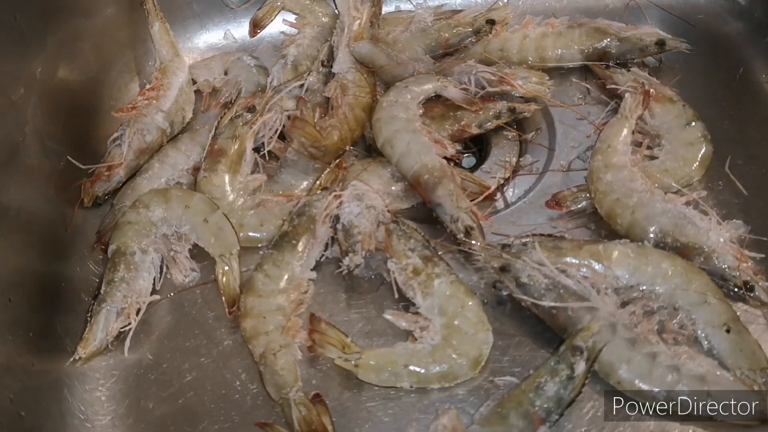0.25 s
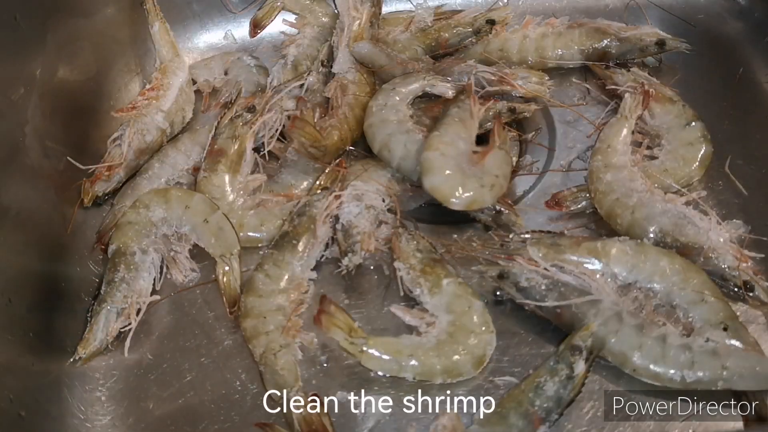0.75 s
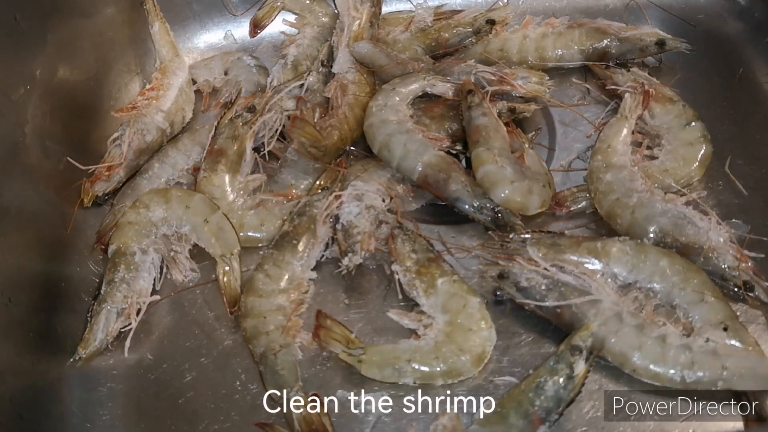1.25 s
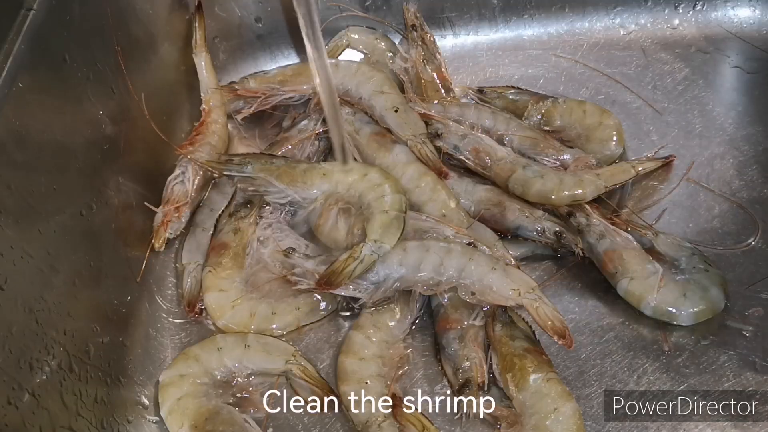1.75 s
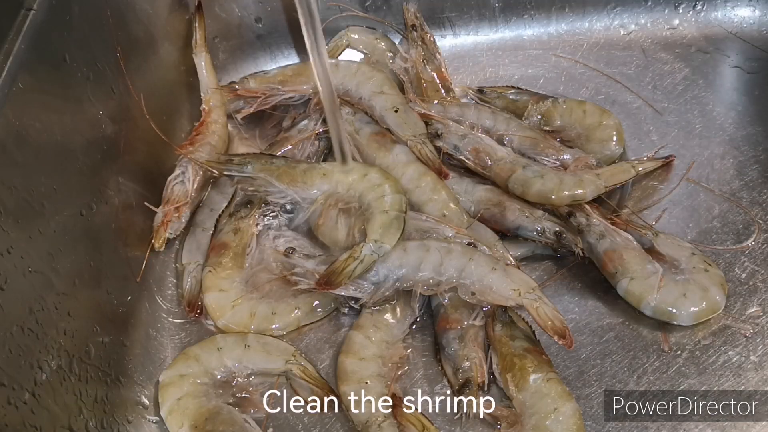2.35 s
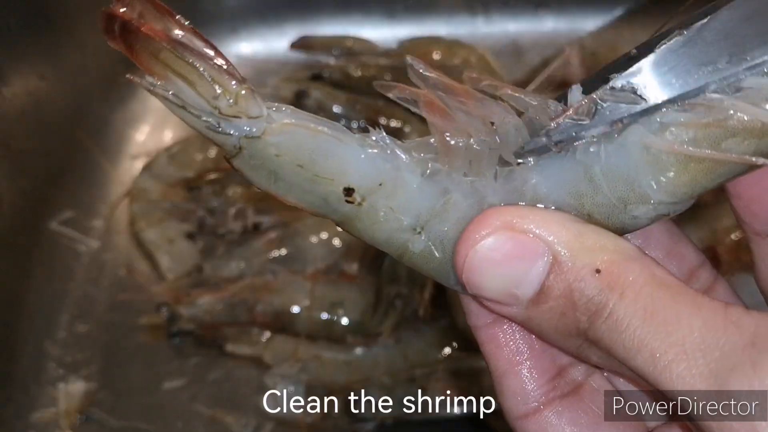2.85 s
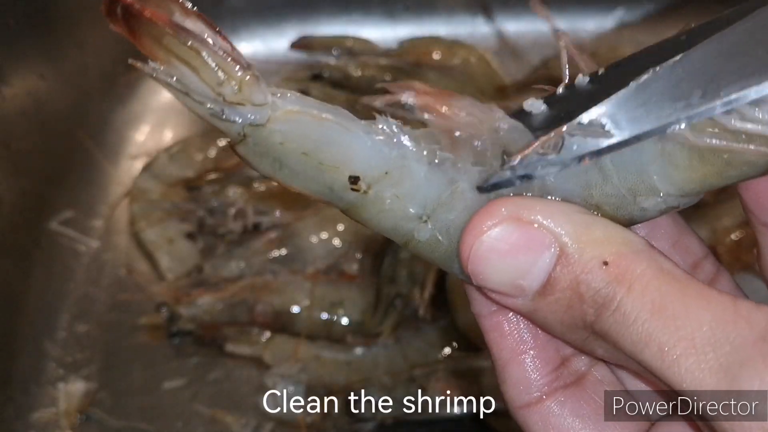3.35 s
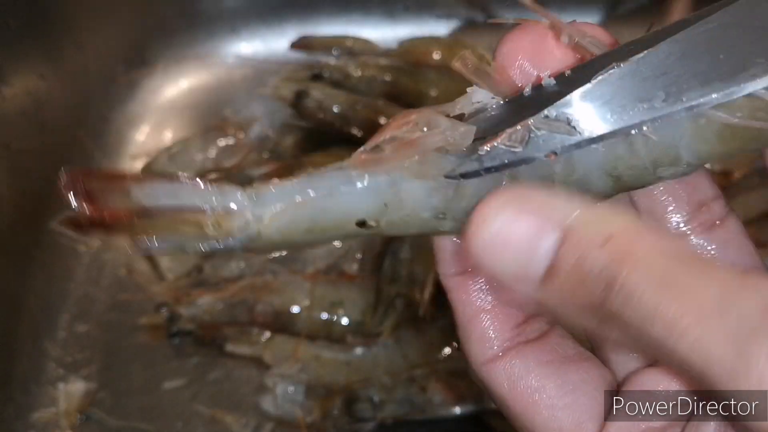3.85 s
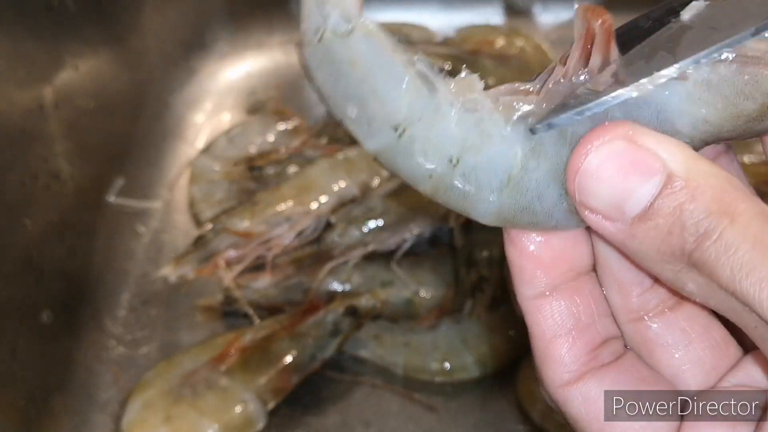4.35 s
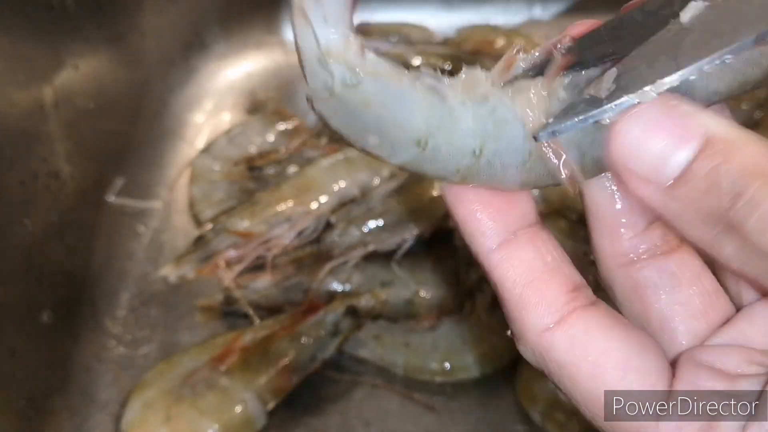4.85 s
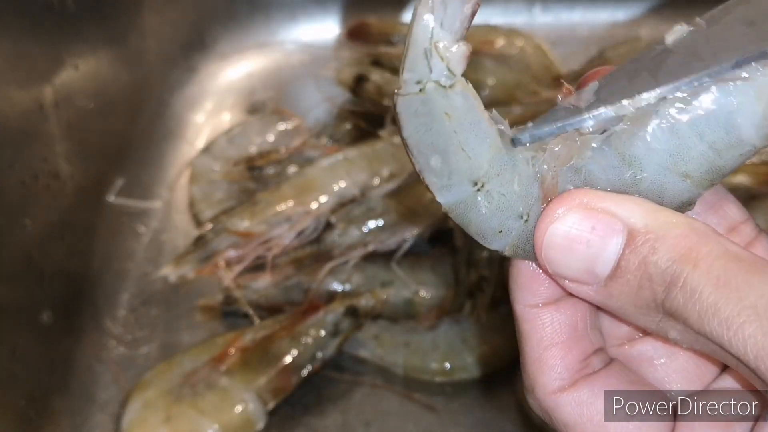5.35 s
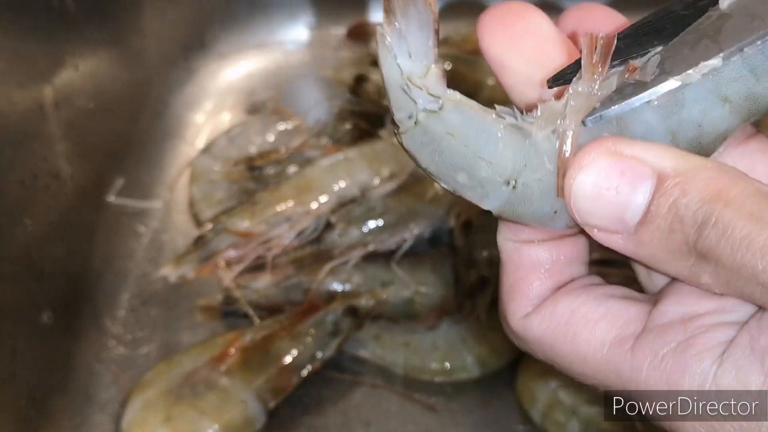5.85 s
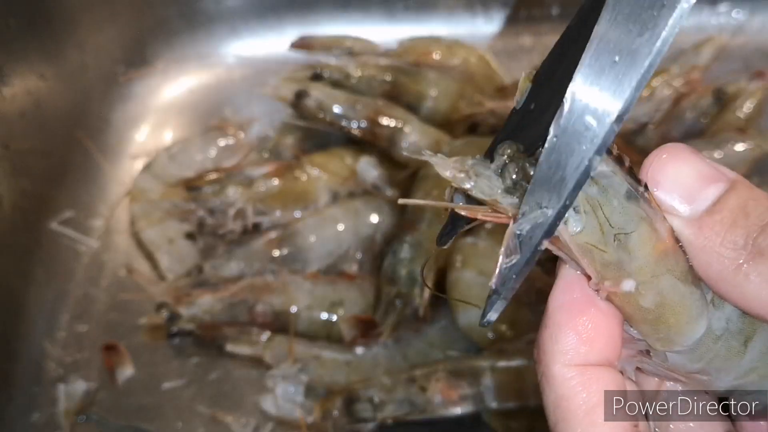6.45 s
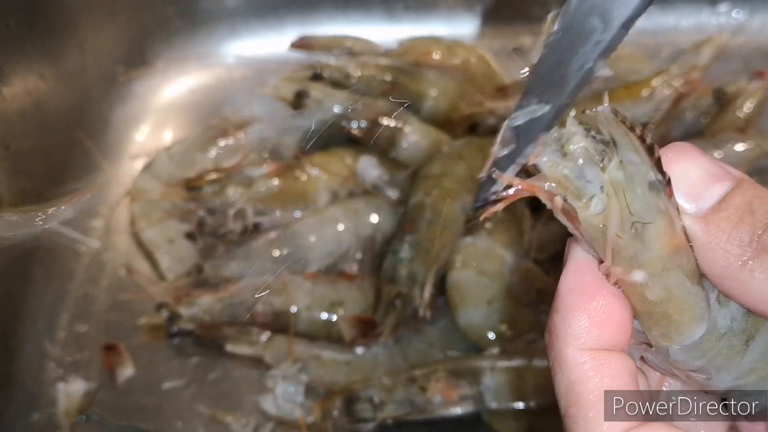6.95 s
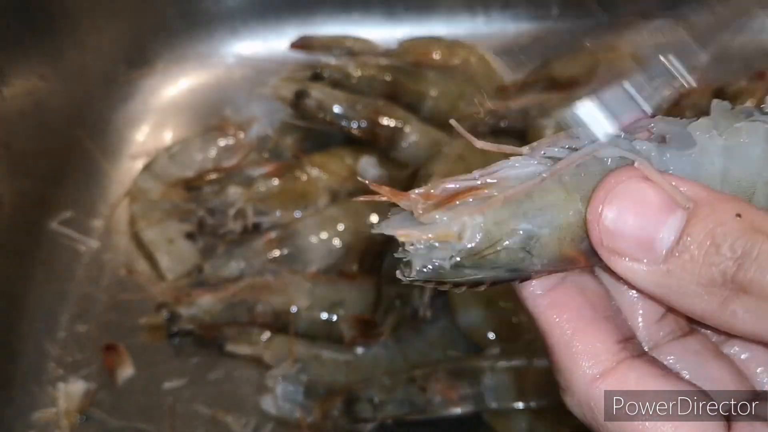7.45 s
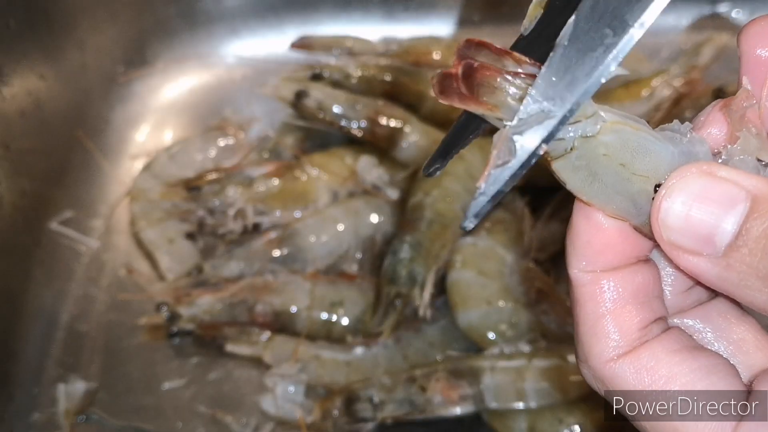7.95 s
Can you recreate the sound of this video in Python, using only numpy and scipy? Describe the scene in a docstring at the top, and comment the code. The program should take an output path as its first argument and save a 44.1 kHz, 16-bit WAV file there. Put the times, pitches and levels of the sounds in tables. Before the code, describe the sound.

Tap water spatters unevenly in a steel kitchen sink, heard close up. At about 0.7 seconds a raw shrimp lands with a wet slap and a thud that briefly rings the basin. The drops thin out around 1 second, then pick up again. From 1.5 seconds the tap runs in a steady, airy hiss with a faint high whistle, drumming softly on the heap of shrimp, and stops abruptly at 2.8 seconds.

Scissors then cut through legs and shells, slightly to the right. Each cut is a run of tiny crackles ending in a sharp snap of the blades. A faint one comes at 3.1 seconds, a loud one at 3.7, moderate ones at 4.6, 5.5 and 6.2, and another loud one with a trailing crunch at 7.1. Small shell ticks and a few soft, dull bumps fall between cuts. A faint kitchen rumble continues until about 8 seconds.

```python
"""At a steel kitchen sink, raw shrimp are being cleaned. Drops of tap water spatter in the basin, and a
shrimp lands with a thud that sets the steel ringing. The tap then hisses steadily on the heap and stops
abruptly. Over the kitchen's faint rumble, scissors crunch through legs and shells in runs of tiny
breaks, and each cut ends in a sharp snap as the blades clack together."""
import sys
import numpy as np
from scipy import signal
from scipy.io import wavfile

SR = 44100
rng = np.random.default_rng(int(sys.argv[2]) if len(sys.argv) > 2 else 0)


def store_pcm(level_fs):
    """Save levels as 16-bit WAV."""
    pcm = np.round(np.clip(level_fs, -1, 1) * 32767).astype(np.int16)
    wavfile.write(sys.argv[1], SR, np.atleast_2d(pcm).T)


N = 361179
TIME = np.arange(N) / SR
JET_START_S, JET_STOP_S = 1.49, 2.838
CUTOFF_HZ = 15750

# Scissor cuts. Each row: time in seconds, snap level in dB, its low edge, high edge and resonance in Hz,
# relative levels of the handle knock, basin echo and squeezed shell in dB, how many seconds ahead of the
# snap the first crack comes, and that crack's level in dB.
SCISSOR_CUTS = [(3.081, -22.5, 1930, 2600, 3000, -28, 9.5, -54, .019, -22.5),
                (3.719, 3.5, 2150, 10100, 3280, -19.5, 0.5, -36.5, .008, -10.5),
                (4.6158, -3, 2400, 12000, 4220, -22, 5.5, -32.5, .0197, -12.5),
                (5.474, -8, 2530, 7000, 4100, -23.5, 5, -55, .014, -38.5),
                (6.1772, -4, 2600, 10500, 3780, -22, 5.5, -41, 0.0089, -20),
                (7.0774, 3, 2440, 14950, 11000, -15.5, 7.5, -33, .0303, -15)]


def amp(db):
    """Turn decibels into a factor to multiply by."""
    return 10 ** (np.asarray(db) / 20)


def rms_one(x):
    """Scale a sound so that its average strength (rms) is 1."""
    return x / np.sqrt(np.mean(x ** 2) + 1e-20)


def panned(db):
    """Left and right gains that make the left louder by db and keep the total power."""
    return rms_one(amp(np.array([[db], [-db]]) / 2))


def at_hz(points, hz):
    """Read the value at hz off a curve given as rows of frequency and value."""
    freqs, values = np.transpose(points)
    return np.interp(np.log(hz), np.log(freqs), values)


def keep(x, hz, kind, order=2):
    """Keep the "low" part, the "high" part or a "band" of a sound."""
    sos = signal.butter(order, np.clip(hz, 10, .45 * SR), kind, fs=SR, output="sos")
    return signal.sosfilt(sos, x + 1e-18)


def drift(per_s):
    """A random wobble that heads for a new value per_s times a second."""
    knots = np.arange(0, N / SR + 1, 1 / per_s)
    return rms_one(np.interp(TIME, knots, rng.standard_normal(len(knots))))


def ring(x, hz, ring_s):
    """Let x set one pitch ringing; it fades by 60 dB in ring_s."""
    decay, angle = amp(-60 / (ring_s * SR)), 2 * np.pi * hz / SR
    return signal.lfilter([0, np.sin(angle)], [1, -2 * decay * np.cos(angle), decay * decay], x + 1e-18)


def noisy_tone(shape, hz, width_hz):
    """Noise keeps a resonance ringing as a wavering tone."""
    return rms_one(ring(rng.standard_normal(shape), hz, np.log(1000) / (np.pi * width_hz)))


def add(track, start_s, sound):
    """Mix a sound into a track at a given time."""
    i = max(round(start_s * SR), 0)
    track[..., i:i + sound.shape[-1]] += sound[..., :N - i]


def between(start_s, stop_s):
    """1 between two times and 0 outside, with short fades."""
    return np.clip(np.minimum(TIME - start_s, stop_s - TIME) / .004 + .5, 0, 1)


def white():
    """Two unrelated pairs of white noise."""
    return rng.standard_normal((2, 2, N))


def coloured(pairs, spectrum, flicker_db, pan=None):
    """Shape two noise pairs into stereo: each narrow band gets its own level, flicker and place."""
    # Each row: frequency in Hz, how alike left and right are (1 is the same, 0 is unrelated).
    likeness = [(130, 1), (290, .85), (450, 0), (700, 0), (1400, 0.038), (3000, 0)]
    # A sound in the middle. Each row: frequency in Hz, left minus right in dB.
    centred = [(100, 0), (1000, 0)]
    out, low, high = 0, spectrum[0][0], min(spectrum[-1][0], CUTOFF_HZ)
    edges = np.geomspace(low, high, round(4 * np.log2(high / low)) + 1)  # four bands an octave
    for k, band in enumerate(zip(edges, edges[1:])):
        hz = np.sqrt(band[0] * band[1])
        mid, side = keep(pairs[k % 2], band, "band")
        alike = np.clip(at_hz(likeness, hz), -1, 1)
        gain = amp(at_hz(spectrum, hz) + flicker_db * drift(per_s=40)) * panned(at_hz(pan or centred, hz))
        out = out + gain * (np.sqrt(1 + alike) * mid + np.sqrt(1 - alike) * side * [[1], [-1]])
    return rms_one(out)


def reflections(fade_s, rise_s):
    """Dense stereo echoes that build up, then fade by 60 dB in fade_s."""
    t = TIME[:SR // 2]
    echoes = rng.standard_normal((2, len(t))) * amp(-60 * t / fade_s) * (1 - np.exp(-t / rise_s))
    return echoes / np.sqrt(np.sum(echoes ** 2, axis=1, keepdims=True))


def echo(x, response):
    """Pass a sound through stereo echoes."""
    return signal.fftconvolve(np.atleast_2d(x), response, axes=1)[:, :x.shape[-1]]


def kitchen():
    """A low rumble with a few room resonances, a faint wavering hum and a hiss."""
    # Tone of the rumble and of the hiss. Each row: frequency in Hz, relative level in dB.
    rumble_colour = [(22, -13), (49, -1), (86, -3), (135, -2), (229, -16), (344, -15), (450, -21),
                     (600, -34), (750, -28), (900, -42)]
    hiss_colour = [(600, -7), (750, -11.5), (1050, -13.5), (1400, -7), (1850, -3), (2400, -6), (3400, -2.5),
                   (5500, -9.5), (8200, -13.5), (15000, -14.5), (16000, -22)]
    # Room resonances. Each row: pitch in Hz, width in Hz, level against the rumble in dB.
    resonances = [(125, 26, -10.5), (300, 32, -13.5), (365, 110, -12.5), (510, 42, -22.5)]
    rumble = coloured(white(), rumble_colour, flicker_db=3)
    for hz, width_hz, level_db in resonances:
        rumble += amp(level_db) * noisy_tone(N, hz, width_hz)
    hum = rms_one(keep(rng.standard_normal(N), [351, 365], "band"))
    hiss = coloured(white(), hiss_colour, flicker_db=0.5)
    lull_db = -6.5 * between(4.11, 6.28)  # the rumble sinks for a while
    return amp(-55 + lull_db) * rumble + amp(-72) * hum + amp(-68.5) * hiss


def bumps():
    """Shrimp, basin and hands bump: a dull rumble swells and fades, then comes back faintly."""
    # Each row: start in seconds, level in dB, swell time in seconds, pitch in Hz.
    dull_bumps = [(0.549, -31, 0.011, 292), (1.961, -29, 0.025, 174.2), (4.216, -42, 0.027, 54),
                  (5.622, -40.5, 0.038, 48.3), (5.63, -45, 0.032, 194)]
    out = np.zeros(N)
    for start_s, level_db, swell_s, hz in dull_bumps:
        t = TIME[:SR // 2] / swell_s
        swell = t * np.exp(1 - t)
        for delay_s, change_db in (0, 0), (0.16, -18.5):
            rumble = keep(rng.standard_normal(SR), [hz - 24, hz + 24], "band")[-len(t):] * swell
            rumble *= np.linalg.norm(swell) / np.linalg.norm(rumble)
            add(out, start_s + delay_s, amp(level_db + change_db) * rumble)
    return out


def drops(per_s, spread_db, wash_db, bubble_db):
    """Drops of uneven size smeared by the basin, small ringing bubbles and a wash of finer spray."""
    sizes = amp(spread_db * np.minimum(rng.exponential(1, (2, N)), 4)) * rng.choice([-1, 1], (2, N))
    impacts = sizes * (rng.random((2, N)) < per_s / SR)
    smeared = np.array([echo(train, reflections(fade_s=0.013, rise_s=0.00024)) for train in impacts])
    # about one drop in three traps a bubble, which rings for 35 cycles
    pitches = np.geomspace(1150, 4800, num=16)
    choice = rng.integers(0, 3 * len(pitches), N)
    bubbles = sum(ring(impacts * (choice == k), hz, 35 / hz) for k, hz in enumerate(pitches))
    bubbles = rms_one(bubbles)[:, None] * [[1], [0]]  # only in the first of each pair
    water = rms_one(smeared) + amp(wash_db) * white() + amp(bubble_db) * bubbles
    walls = reflections(fade_s=0.043, rise_s=0.00072)
    return np.array([pair + amp(-8.5) * echo(pair, walls) for pair in water])


def spatter():
    """The stream breaks into drops on the steel and sets the basin drumming."""
    # Strength of the flow. Each row: time in seconds, relative level in dB.
    flow_curve = [(0.0, -34.5), (0.064, -29), (0.172, -30), (0.266, -36.5), (0.358, -30), (0.42, -35),
                  (0.56, -31), (0.6, -46.5), (0.654, -42.5), (0.662, -26.5), (0.736, -49), (0.898, -50),
                  (1.03, -64), (1.12, -54.5), (1.146, -40.5), (1.276, -33.5), (1.298, -36.5), (1.48, -36.5)]
    # Tone of the spray and of the drumming. Each row: frequency in Hz, relative level in dB.
    spray_colour = [(300, -23), (420, -20), (650, -18), (1030, -10), (1600, -6.5), (2200, 0), (3400, -5),
                    (5500, -2.5), (6900, -3), (7900, 0.5), (9300, -9), (11500, -17), (14500, -24),
                    (16000, -30)]
    drum_colour = [(25, -3), (60, 1), (120, -10), (200, -7.5), (290, -20), (400, -35)]
    flow = amp(np.interp(TIME, *np.transpose(flow_curve))) * between(-1, JET_START_S)
    water = drops(per_s=900, spread_db=3, wash_db=-3.5, bubble_db=-10.5)
    spray = coloured(water, spray_colour, flicker_db=1.7,
                     pan=[(1300, 0.54), (4400, 2.3), (8100, 5.5), (15000, 0.43)])
    sizzle = keep(spray, [7550, 8300], "band", order=1)
    drum = coloured(white(), drum_colour, flicker_db=3.5)
    return flow * (amp(3.5) * (spray + sizzle) + amp(-14) * drum)


def jet():
    """The tap's airy jet hisses and whistles, and drums softly through the heap of shrimp."""
    # Tone of the hiss and of the drumming. Each row: frequency in Hz, relative level in dB.
    hiss_colour = [(350, -14), (500, -16.5), (760, -13.5), (1050, -25.5), (1400, -15), (1950, -7.5),
                   (2600, -2), (4000, -4), (5600, -7.5), (8400, -7.5), (10900, -6), (12200, -11.5),
                   (13500, -26.5), (16000, -33)]
    drum_colour = [(25, -8.5), (100, -12), (160, 0), (215, -15), (290, -11), (400, -30.5)]
    # Where the jet is heard. Each row: frequency in Hz, left minus right in dB.
    pan = [(400, 2.5), (1300, 0), (2400, 4.5), (4400, -0.5), (8000, 6.5), (15000, 12)]
    # Whistles of the tap. Each row: pitch in Hz, width in Hz, level in dB.
    whistles = [(1954, 33, -52), (2566, 73, -49), (2970, 65, -47), (4830, 86, -51.5), (9650, 38, -48),
                (10550, 36, -50.5), (10870, 36, -39.5), (11190, 91, -37.5)]
    water = drops(per_s=2500, spread_db=5, wash_db=4.5, bubble_db=-7.5)
    hiss = amp(-33) * coloured(water, hiss_colour, flicker_db=1.54, pan=pan)
    for hz, width_hz, level_db in whistles:
        hiss += amp(level_db) * noisy_tone((2, N), hz, width_hz) * panned(at_hz(pan, hz))
    drum = amp(-46) * coloured(white(), drum_colour, flicker_db=3.5)
    return (hiss + drum) * between(JET_START_S, JET_STOP_S)


def landings():
    """A soft body sets the basin floor ringing and slaps the film of water on it."""
    # Shrimp, gushes and offcuts landing. Each row: time in seconds, relative levels of the thud and
    # the wet slap in dB, the slap's high edge in Hz.
    falls = [(0.552, -37.5, -3.5, 3600), (0.6625, -17, -12, 9000), (0.67, -6.5, -13, 7000),
             (.681, -20.5, -16, 6080), (.759, -13.5, -17.5, 2770), (1.144, -46, -21, 2500),
             (7.196, -59, -28, 7000), (7.220, -57.5, -25, 6900)]
    # The basin's tones. Each row: pitch in Hz, relative level in dB, ring time when empty in seconds.
    basin_tones = [(61.6, -4.5, .28), (117.3, -1.5, 0.15), (155, 1, 0.092), (191.2, -4, 0.25),
                   (208, -5, 0.24), (285.6, -6.5, 0.3), (291, -2, 0.09), (358, -8, .07), (440, -8, 0.13),
                   (572, -5, 0.11), (1145, -0.5, 0.074)]
    flops = [(.799 + k * .0248, -24, -19, 2010) for k in range(4)]  # the dropped shrimp settle
    heavy_db, ring_left = -20.5, 0.71  # the heap of shrimp shortens the ringing to this share
    thud, slap = np.zeros((2, N)), np.zeros((2, N))
    t = TIME[:SR // 2]
    for start_s, thud_db, slap_db, high_hz in falls + flops:
        # a heavier body stays in contact longer: twice as long every 12 dB, up to heavy_db
        contact_s = 0.0032 * 2 ** min((thud_db - heavy_db) / 12, 0)
        force = t / contact_s * np.exp(-5 * t / contact_s)
        for hz, level_db, ring_s in basin_tones:
            detuned_hz = hz * rng.normal(1, 0.032)  # the sliding load shifts the pitch
            tone = amp(thud_db + level_db) * ring(force / force.sum(), detuned_hz, ring_left * ring_s)
            side = keep(tone, 330, "high") * [[1], [-1]]  # higher tones reach left and right out of step
            add(thud, start_s, (tone + side) * panned(at_hz([(110, 1), (300, 2.5)], hz)))
        spray = reflections(fade_s=0.027, rise_s=.0005)
        spray += amp(-5) * reflections(fade_s=0.18, rise_s=0.0018)
        add(slap, start_s, amp(slap_db) * keep(spray, high_hz, "low"))
    # the flesh wobbles and settles after each blow
    thud += amp(-4) * echo(thud.mean(axis=0), reflections(fade_s=0.15, rise_s=0.0048))[0]
    return keep(thud, 48, "high", order=3) + amp(16.5) * keep(slap, 370, "high") * panned(3.7)


def near_sink(x, basin_db, room_db):
    """The scissors are heard on the right first; the basin echoes at once and the kitchen answers."""
    left = amp(-7) * np.pad(x, (8, 0))[:len(x)]  # 8 samples late
    basin = echo(x, reflections(fade_s=0.029, rise_s=0.00022)) * panned(0.87)
    room = keep(echo(x, reflections(fade_s=0.16, rise_s=0.0089)), 8300, "low", order=1)
    return np.array([left, x]) + amp(basin_db) * basin + amp(room_db) * room


def crack(level_db, low_hz):
    """One break of thin shell: a bright click with a faint body."""
    click = amp(level_db) * signal.unit_impulse(SR // 10)
    return keep(click, low_hz, "high", order=3) + amp(-20) * keep(click, low_hz / 8, "high")


def crunch(length_s, first_db, last_db, low_hz, breaks_per_s=2200):
    """A run of tiny breaks of uneven size; the level slides from its first value to its last."""
    t = TIME[:SR // 2]
    breaks = (rng.random(len(t)) < breaks_per_s / SR) * rng.choice([-1, 1], len(t))
    sizes = amp(5 * rng.standard_normal(len(t)))
    pressure = amp(np.interp(t, [0, length_s], [first_db, last_db])) * (t < length_s)
    return amp(-2.5) * keep(rms_one(breaks * sizes) * pressure, low_hz, "high", order=4)


def shell():
    """The shell ticks, cracks and crumbles before each snap, with stray cracks and crunches between."""
    # Lone cracks and blade touches. Each row: time in seconds, relative level in dB, low edge in Hz.
    stray_cracks = [(2.973, -23.5, 8040), (2.993, -24.5, 2730), (3.23, -20.5, 8950), (3.325, -30, 9000),
                    (3.439, -36.5, 2500), (4.830, -25, 900), (6.099, -25, 5970), (6.691, -21.5, 2180),
                    (6.443, -34.5, 8000), (6.892, -29.5, 4000), (6.955, -26, 6050), (8.047, -26.5, 5880)]
    # The blades plough through shell. Each row: start and end in seconds, first and last level in dB.
    slow_crunches = [(2.99, 3.055, -55, -61), (3.199, 3.233, -61, -55), (6.974, 7.073, -46.5, -52.5),
                     (7.096, 7.192, -32, -49.5)]
    grip_s, squeeze_s, finest_hz = .28, .032, 11000
    out = np.zeros(N)
    ticks_per_s = 5 * (TIME > JET_STOP_S)
    for snap_s, *_, squeeze_db, ahead_s, crack_db in SCISSOR_CUTS:
        # as the blades take hold, the shell ticks faster and crackles faintly
        ticks_per_s = ticks_per_s + 17 * between(snap_s - grip_s, snap_s)
        add(out, snap_s - grip_s, crunch(grip_s, -70.5, -63.5, finest_hz))
        add(out, snap_s - ahead_s, crack(crack_db, low_hz=7000))
        add(out, snap_s - squeeze_s, crunch(squeeze_s, squeeze_db - 30, squeeze_db, low_hz=4200))
        add(out, snap_s + .115, crunch(0.039, -64, -64, finest_hz))  # the blades rub as they part
    for start_s, level_db, low_hz in stray_cracks:
        add(out, start_s, crack(level_db, low_hz))
    for start_s, stop_s, first_db, last_db in slow_crunches:
        # fainter crunches are finer: the low edge rises an octave for every 4 dB below -52 dB
        octaves = max((-52 - (first_db + last_db) / 2) / 4, 0)
        low_hz = min(2400 * 2 ** octaves, finest_hz)
        add(out, start_s, crunch(stop_s - start_s, first_db, last_db, low_hz))
    # wet shell ticks in clumps as it is handled
    ticks = rng.random(N) < ticks_per_s * amp(5 * drift(per_s=12)) / SR
    out += keep(ticks * amp(-42.5 + 4.4 * rng.standard_normal(N)), 9000, "high")
    # the blades lend the breaks a middle and a high resonance
    middle = keep(out, [2400, 4400], "band", order=1)
    high = keep(out, [11500, 15000], "band", order=1)
    out += amp(-5) * middle + amp(-3.5) * high
    return near_sink(keep(out, 9200, "low", order=1), basin_db=4.5, room_db=-3.5)


def snips():
    """The shell parts and the blades clack together: one hard click, coloured by the shell."""
    out = np.zeros((2, N))
    for snap_s, level_db, low_hz, high_hz, shell_hz, knock_db, echo_db, *_ in SCISSOR_CUTS:
        click = keep(amp(level_db) * signal.unit_impulse(SR // 2), high_hz, "low", order=1)
        clack = keep(click, low_hz, "high", order=6)
        clack += amp(-1.5) * keep(clack, [shell_hz / 1.11, shell_hz * 1.17], "band", order=1)
        handle_knock = amp(knock_db) * keep(click, [150, 1900], "band")
        add(out, snap_s, near_sink(clack + handle_knock, basin_db=echo_db + 3, room_db=0.62 * echo_db - 3))
    return out


def scene():
    """Rinsing, then trimming, over the sound of the kitchen."""
    return spatter() + jet() + landings() + snips() + shell() + bumps() + kitchen()


def record(dry):
    """Clip any peak beyond full scale and remove the highest treble."""
    treble_cut = signal.ellip(10, .1, 80, CUTOFF_HZ, fs=SR, output="sos")
    return signal.sosfilt(treble_cut, np.clip(dry, -1, 1))


dry = scene()
out = record(dry)
store_pcm(out)
```